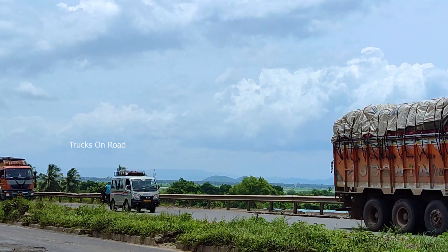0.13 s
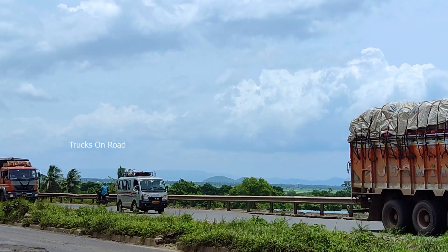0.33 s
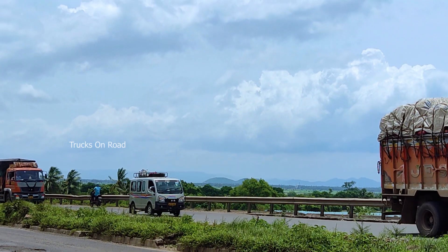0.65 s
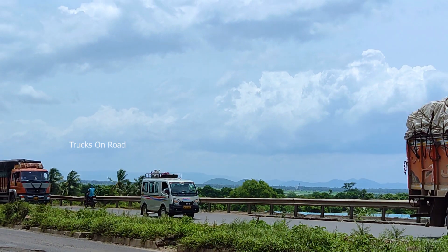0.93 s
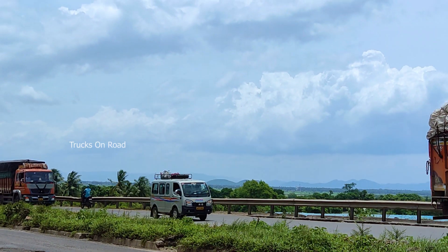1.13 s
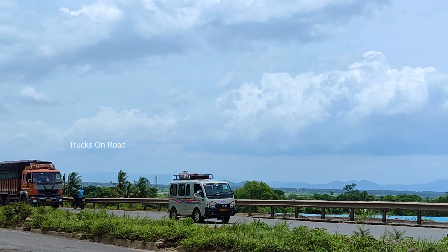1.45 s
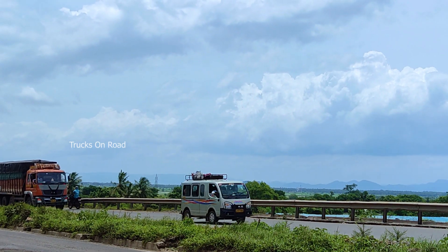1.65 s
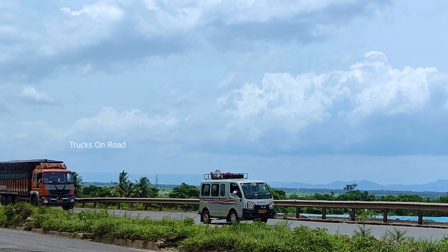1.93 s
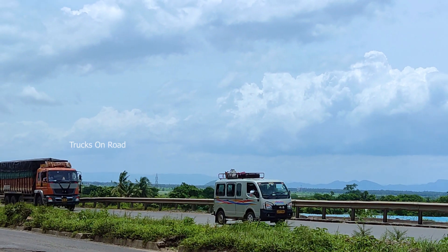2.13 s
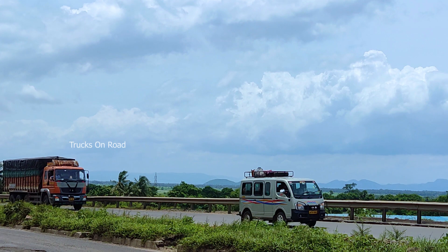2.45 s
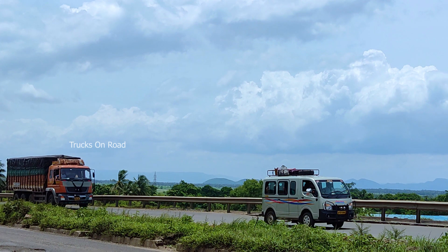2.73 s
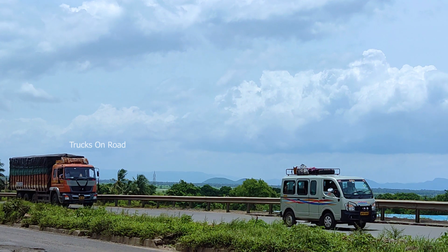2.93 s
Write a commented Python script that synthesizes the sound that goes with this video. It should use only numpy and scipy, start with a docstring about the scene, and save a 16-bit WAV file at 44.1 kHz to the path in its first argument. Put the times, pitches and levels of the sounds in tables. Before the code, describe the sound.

Wind rumbles and puffs independently on left and right microphone ports throughout, while steady, flickering tyre hiss leans left, with a faint singing band and a thin, high turbo whistle slowly climbing; outdoors beside a road.

```python
"""A low wind rumble lies throughout over the hiss of lorries and a van, at a gusty roadside.
Two bare microphone ports hear it: slow random lumps make the rumble, bursts of noise the hollow puffs.
Coloured noise makes the tyre roar, treble hiss and a faint singing band; it comes from the left.
A wavering sine makes a turbocharger whistle that climbs in pitch."""
import sys
import numpy as np
from scipy import signal
from scipy.fft import rfft, irfft, next_fast_len
from scipy.io import wavfile
from scipy.ndimage import uniform_filter1d, map_coordinates

SR = 44100
rng = np.random.default_rng(int(sys.argv[2]) if len(sys.argv) > 2 else 0)


def to_wav(sig):
    """Store sig (one row per channel, or 1-D mono) as 16-bit WAV at the path in sys.argv[1].

    Samples outside -1..1 are clipped; the rate is SR.
    """
    pcm = np.clip(np.atleast_2d(sig), -1, 1) * 32767
    pcm = np.round(pcm).astype(np.int16)
    wavfile.write(sys.argv[1], SR, pcm.T)  # frames by channels


N = 136710  # length in samples

# Steady buffeting of each port by the wind: (t/s, level/dB)
RUMBLE_LEVEL_LEFT = [(0.0, -30.5), (0.07, -39), (0.16, -33.5), (0.34, -37.5), (0.43, -31.5), (0.65, -33.5),
                     (0.91, -37.5), (1.07, -33), (1.22, -27.5), (1.33, -32), (1.42, -27), (1.51, -29),
                     (2.43, -32), (2.51, -34), (2.62, -28), (3.1, -35.5)]
RUMBLE_LEVEL_RIGHT = [(0.0, -38.5), (0.24, -32.5), (0.32, -37.5), (0.53, -33.5), (0.64, -37.5),
                      (1.12, -33.5), (1.33, -35.5), (1.741, -32), (1.82, -33.5), (2.09, -33.5), (2.19, -37),
                      (2.64, -32), (2.71, -41), (2.77, -35.5), (2.96, -32.5), (3.1, -36.5)]
# Colour of the wind rumble: (f/Hz, gain/dB)
RUMBLE_COLOUR = [(20, -3), (40, 1), (120, -1), (250, -4.5), (500, -15.5), (900, -25), (1500, -61),
                 (2500, -120)]
LUMP_DB, LUMP_RATE = 2.5, 40  # depth of the lumps in dB, random points a second

# Traffic at each port: (t/s, tyre roar level/dB, treble hiss level/dB before it flickers)
TRAFFIC_LEVELS_LEFT = [(0.0, -44.5, -47), (0.17, -45.5, -41.5), (0.29, -44.5, -48), (0.53, -43.5, -45),
                       (1.21, -47, -44.5), (1.29, -49.5, -48), (1.39, -42, -44.5), (1.47, -50.5, -52.5),
                       (1.66, -47, -49), (1.85, -47, -51), (1.961, -45.5, -42.5), (2.05, -44, -42.5),
                       (2.17, -51, -50.5), (2.36, -42, -43), (2.41, -48.5, -43.5), (2.51, -52, -51.5),
                       (2.61, -43.5, -43), (2.7, -52, -49), (2.842, -45.5, -44.5), (2.93, -50.5, -45),
                       (3.0, -47, -41), (3.1, -47, -44)]
TRAFFIC_LEVELS_RIGHT = [(0.0, -47, -51), (0.15, -48, -46), (0.29, -47, -51), (0.52, -46.5, -49),
                        (1.03, -46.5, -51.5), (1.26, -47.5, -53), (1.34, -53, -56), (1.4, -44.5, -53),
                        (1.48, -49, -59.5), (1.68, -48, -51), (1.76, -46, -53), (1.818, -60, -65),
                        (1.881, -49, -53.5), (2.032, -42.5, -44), (2.18, -50.5, -55), (2.36, -43, -46),
                        (2.51, -47, -47.5), (2.6, -44, -51), (2.711, -55.5, -59), (2.78, -44.5, -52),
                        (2.94, -50.5, -49), (3.1, -47, -48)]
# Colour of the traffic noise at each port, # stepped near 2.4, 3.85 and 9.65 kHz: (f/Hz, gain/dB)
TRAFFIC_COLOUR_LEFT = [(1000, -7), (2350, -8), (2420, 1), (3000, 0), (3780, -4), (3900, -11.5),
                       (4650, -10.5), (5100, -8), (5800, -12), (7900, -3.5), (9300, -12.5), (9600, -12.5),
                       (9700, -6.5), (10400, -8.5), (11100, -14), (12050, -13), (12200, -16.5),
                       (14100, -19)]
TRAFFIC_COLOUR_RIGHT = [(1000, -8), (2350, -8), (2420, 0), (3000, -1.5), (3780, -9), (3900, -17),
                        (4650, -18), (5170, -12), (5600, -15), (7000, -14), (8800, -10), (9600, -11),
                        (9700, -7), (11000, -19), (12050, -19), (12200, -24), (14100, -33)]
# Traffic noise that both ports share: (f/Hz, share of the power from 0 to 1)
SHARED_POWER = [(1500, 0.81), (3000, 0.44), (5000, 0.34), (8000, 0.25), (12000, .05)]
# How much earlier the left port hears the shared noise: (t/s, lead/s)
LEFT_LEAD = [(0, 0.0002), (3.1, 0.000497)]
TRAFFIC_PATCH_DB = 1.2  # depth of the random patches in the traffic noise
SPLIT_HZ = 3850  # tyre roar below, hiss above
LOW_HZ = 523  # the roar thins out around and below this
# Upper part of the roar, against the rest of it: (t/s, gain/dB)
ROAR_EDGE_GAIN = [(1.3, 0.5), (1.8, -3), (3.1, -0.5)]
ROAR_EDGE_HZ = 3010  # the upper part starts here
# random flicker of hiss, singing and whistle, shared by both ports: depth in dB, random points a second
FLICKER_DB, FLICKER_RATE = 1.2, 22

# Middle of the band of singing noise: (t/s, centre f/Hz)
SING_PITCH = [(0, 5260), (1.2, 5245), (2, 4874), (3.1, 4960)]
SING_DB, SING_LEFT_DB = -17.5, 7.5  # against the hiss; added on the left, taken off on the right
SING_RATE = 380  # random points a second; more of them make a wider band

# Turbocharger pitch, before it wavers: (t/s, f/Hz)
TURBO_PITCH = [(0, 9620), (.5, 9860), (.9, 10020), (1.3, 10240), (1.7, 10340), (2.1, 10400), (2.5, 10450),
               (3.1, 10440)]
# Turbocharger gain against the hiss, before fading and left-right balance: (t/s, gain/dB)
TURBO_GAIN = [(0, -16), (1.5, -15), (1.7, -10), (3.1, -14.5)]
TURBO_WAVER_HZ, TURBO_FADE_DB = 14, 3.5  # depth of the random waver and of the random fading
TURBO_LEFT_DB = 1.5  # added on the left, taken off on the right

FAR_DB, FAR_TOP_HZ = -64.5, 6400  # steady bed of low treble from farther traffic: level, upper limit

# Puffs of wind on each port: (t/s, length/s, level/dB, centre f/Hz, treble fall/(dB/octave))
WIND_PUFFS_LEFT = [(0.15, 0.012, -24, 348, 33), (0.227, 0.017, -31, 315, 14),
                   (0.299, 0.014, -30, 228, 13.5), (0.41, 0.061, -32, 205, 16),
                   (0.422, 0.013, -22.5, 165, 14.5), (0.494, 0.0035, -33.5, 420, 7),
                   (0.572, 0.0082, -26, 111, 11), (0.711, 0.032, -30, 261, 21),
                   (0.819, 0.026, -29, 156, 30), (0.82, 0.0098, -26, 583, 50),
                   (0.89, 0.034, -28.5, 317, 19), (0.985, 0.039, -33, 394, 12),
                   (1.148, 0.074, -37, 910, -4), (1.172, 0.051, -21.5, 420, 15),
                   (1.237, 0.019, -17, 484, 15), (1.272, 0.039, -19, 397, 10.5),
                   (1.324, 0.036, -26, 417, 16), (1.382, 0.0097, -19, 423, 21),
                   (1.402, 0.12, -28.5, 362, 11.5), (1.524, 0.043, -31, 310, 7.5),
                   (1.564, 0.056, -30.5, 260, 9), (1.646, 0.021, -26.5, 264, 20),
                   (1.695, 0.007, -20, 364, 15), (1.878, 0.084, -33, 383, 15),
                   (2.033, 0.08, -30.5, 383, 6.5), (2.185, 0.023, -27.5, 277, 13),
                   (2.225, 0.015, -33, 216, 9), (2.347, 0.09, -29.5, 290, 9), (2.454, 0.049, -38, 303, 11),
                   (2.542, 0.1, -34.5, 280, 8), (2.619, 0.097, -25, 377, 14), (2.789, 0.021, -22, 510, 24),
                   (2.859, 0.082, -29, 263, 9), (2.943, 0.045, -29, 230, 36),
                   (3.041, 0.043, -33, 250, 14.5)]
WIND_PUFFS_RIGHT = [(0.107, 0.0099, -22.5, 323, 26), (0.132, 0.013, -23.5, 414, 40),
                    (0.234, 0.033, -19, 486, 36), (0.768, 0.015, -35, 336, 18),
                    (0.819, 0.006, -24, 545, 54), (0.9, 0.12, -30, 400, 37), (0.955, 0.048, -27.5, 466, 28),
                    (1.005, 0.019, -21.5, 500, 73), (1.073, 0.018, -67, 384, 5),
                    (1.108, 0.041, -20.5, 360, 16), (1.142, 0.038, -17, 553, 14),
                    (1.19, 0.023, -17, 576, 19), (1.218, 0.022, -13, 505, 16),
                    (1.248, 0.026, -12.5, 450, 10.5), (1.272, 0.03, -12, 358, 12.7),
                    (1.304, 0.041, -21.5, 425, 12.6), (1.362, 0.041, -27, 503, 13),
                    (1.407, 0.067, -22, 454, 17), (1.525, 0.014, -21, 500, 11),
                    (1.539, 0.027, -22.5, 540, 12.5), (1.591, 0.013, -24.5, 520, 13),
                    (1.672, 0.0064, -29, 480, 17), (1.706, 0.0051, -21.5, 450, 21),
                    (1.746, 0.0064, -23, 408, 21), (1.775, 0.006, -20, 420, 16),
                    (1.873, 0.051, -24.5, 486, 17), (2.015, 0.017, -20, 645, 23),
                    (2.038, 0.063, -23, 785, 13), (2.058, 0.04, -21, 790, 41), (2.11, 0.042, -26, 620, 11),
                    (2.22, 0.022, -32, 315, 7.8), (2.375, 0.012, -25, 595, 11),
                    (2.522, 0.043, -29, 550, 15), (2.585, 0.018, -25, 930, 34),
                    (2.605, 0.041, -16, 500, 11.5), (2.643, 0.033, -18, 590, 16.6),
                    (2.676, 0.02, -22.5, 430, 30), (2.714, 0.024, -36, 435, 30),
                    (2.768, 0.028, -18, 592, 34), (2.831, 0.094, -27.5, 467, 11),
                    (2.913, 0.073, -32.5, 390, 14.5), (2.963, 0.061, -29, 405, 13.3)]
PUFF_RISE_DB, PUFF_KNEE = 4, 1.232  # rise in dB an octave below the knee; knee over centre
CORE_DB, CORE_WIDTH = 6, 0.19  # hollow core at the centre; width in octaves, also of the overtone
OVERTONE_DB = 1.5  # weaker overtone an octave above the centre
BASS_HZ, BASS_FREE_DB = 271, -29.5  # below this pitch, puffs above this level lose bass
BASS_LOSS = 1  # dB lost for each dB above that level
PUFF_TOP_HZ = 1940  # puffs weaken above
FLUTTER_DB, FLUTTER_RATE = 3, 76.8  # depth in dB, random points a second
PUFF_STEADY = 0.69  # how far chance swells of the puff noise are evened out, 0-1
PUFF_ATTACK_S, PUFF_RELEASE_S = 0.00058, 0.0015  # softness of the edges, before the share below
PUFF_SOFTEN = 0.15  # share of the length added to the release; half as much to the attack
PUFF_LEAD_IN_S = 0.03  # room for the soft attack

TOP_HZ = 14200  # the recorder's band limit


def amp(db):
    """Turn decibels into a plain multiplier."""
    return 10 ** (np.asarray(db) / 20)


def unit(x):
    """Scale a signal to an average (rms) strength of 1."""
    return x / np.sqrt(np.mean(x ** 2) + 1e-20)


def along(points, hz):
    """Read values between (f/Hz, value) points on a log pitch axis."""
    f, v = np.transpose(points)
    return np.interp(np.log(hz + 1), np.log(f + 1), v)


def curves(rows):
    """Draw one value per sample for each column after the time."""
    times, *columns = np.transpose(rows)
    return [np.interp(np.arange(N) / SR, times, column) for column in columns]


def wobble(rate):
    """Make a smooth random curve through this many random points a second."""
    return map_coordinates(rng.standard_normal(4000), [np.arange(N) * rate / SR])


def filtered(x, response):
    """Multiply each frequency of x by the response."""
    m = next_fast_len(N + SR // 2)
    spectrum = rfft(x, m) * response(np.fft.rfftfreq(m, 1 / SR))
    return irfft(spectrum, m)[..., :N]


def patches(shape, bins, frames):
    """Make a random field of rms 1, smooth over some frequency bins and time frames."""
    across_pitch = uniform_filter1d(rng.standard_normal(shape), bins, axis=0)
    return unit(uniform_filter1d(across_pitch, frames, axis=1))


def tone(track, waver_hz):
    """Make a sine that follows a pitch curve and wavers around it."""
    pitch_hz = curves(track)[0] + waver_hz * wobble(99)
    return np.sin(2 * np.pi * np.cumsum(pitch_hz) / SR)


def rumble(levels):
    """Slow eddies press on the port in lumps."""
    noise = filtered(rng.standard_normal(N), lambda hz: amp(along(RUMBLE_COLOUR, hz)))
    lumpy = unit(noise * amp(LUMP_DB * wobble(LUMP_RATE)))
    return amp(curves(levels)[0]) * lumpy


def traffic_noises():
    """Patchy noise, partly shared by the ports; the shared part reaches the left port first."""
    grid = signal.stft(rng.standard_normal((3, N)), nperseg=512)[2]
    patchy = grid * amp(TRAFFIC_PATCH_DB * patches(grid.shape[1:], 5, 6))
    common, *own = signal.istft(patchy, nperseg=512)[1][:, :N]
    late = map_coordinates(common, [np.arange(N) - SR * curves(LEFT_LEAD)[0]], order=5)
    share = lambda hz: np.clip(along(SHARED_POWER, hz), 0, 1)
    return [filtered(shared, lambda hz: np.sqrt(share(hz)))
            + filtered(alone, lambda hz: np.sqrt(1 - share(hz)))
            for shared, alone in zip((common, late), own)]


def tyre_roar(noise, colour):
    """The lower traffic noise, whose upper part changes in strength with time."""
    def response(hz):
        return amp(along(colour, hz)) * (hz < SPLIT_HZ) / (1 + (LOW_HZ / (hz + 1)) ** 4)
    roar = filtered(noise, response)
    edge = filtered(roar, lambda hz: hz > ROAR_EDGE_HZ)
    return unit(roar - edge + amp(curves(ROAR_EDGE_GAIN)[0]) * edge)


def treble_hiss(noise, colour):
    """The traffic noise above the split, in its colour at each port."""
    return unit(filtered(noise, lambda hz: amp(along(colour, hz)) * (hz >= SPLIT_HZ)))


def singing(side):
    """A sine made strong and weak at random spreads into a narrow band of noise."""
    return amp(SING_DB + side * SING_LEFT_DB) * unit(tone(SING_PITCH, 0) * wobble(SING_RATE))


def turbo_whistle():
    """A climbing, wavering sine that comes and goes in strength."""
    gain_db = curves(TURBO_GAIN)[0] + TURBO_FADE_DB * wobble(23)
    return tone(TURBO_PITCH, TURBO_WAVER_HZ) * amp(gain_db)


def far_traffic(colour):
    """A steady bed of noise in the low treble."""
    def response(hz):
        return amp(along(colour, hz)) * (hz >= SPLIT_HZ) * (hz < FAR_TOP_HZ)
    return amp(FAR_DB) * unit(filtered(rng.standard_normal(N), response))


def traffic():
    """Each port adds roar and far traffic to a flickering mix of hiss, singing and whistle."""
    whistle = turbo_whistle()
    flicker_db = FLICKER_DB * wobble(FLICKER_RATE)
    ports = [(TRAFFIC_LEVELS_LEFT, TRAFFIC_COLOUR_LEFT, 1),
             (TRAFFIC_LEVELS_RIGHT, TRAFFIC_COLOUR_RIGHT, -1)]
    out = []
    for noise, (levels, colour, side) in zip(traffic_noises(), ports):
        roar_db, hiss_db = curves(levels)
        roar = amp(roar_db) * tyre_roar(noise, colour)
        treble = treble_hiss(noise, colour) + singing(side) + amp(side * TURBO_LEFT_DB) * whistle
        out.append(far_traffic(colour) + roar + amp(hiss_db + flicker_db) * treble)
    return np.array(out)


def puff_colour(hz, db, centre_hz, fall_db):
    """Each puff is strongest around a centre pitch, with a weaker overtone an octave up."""
    x = hz / (centre_hz * PUFF_KNEE)
    broad = 1 / np.sqrt(x ** (-PUFF_RISE_DB / 3) + x ** (fall_db / 3))
    peak = lambda at: np.exp(-(np.log2(hz / at) / CORE_WIDTH) ** 2 / 2)
    core_db = CORE_DB * peak(centre_hz) + OVERTONE_DB * peak(2 * centre_hz)
    # stronger puffs lose more bass
    bass_db = -BASS_LOSS * max(db - BASS_FREE_DB, 0) / (1 + (hz / BASS_HZ) ** 16)
    return broad * amp(core_db + bass_db) / (1 + (hz / PUFF_TOP_HZ) ** 4)


def puffs(rows):
    """Each puff of coloured noise rises, holds and dies while it flutters."""
    size = 8192  # samples for one puff
    out = np.zeros(N + size)
    t, hz = np.arange(size) / SR, np.fft.rfftfreq(size, 1 / SR) + 1
    noises = rng.standard_normal((len(rows), size))
    for (start, length, db, centre_hz, fall_db), noise in zip(rows, noises):
        coloured = unit(irfft(rfft(noise) * puff_colour(hz, db, centre_hz, fall_db)))
        swell = np.abs(uniform_filter1d(coloured ** 2, 400) + .05)
        steadier = coloured / swell ** (PUFF_STEADY / 2)
        attack = PUFF_ATTACK_S + PUFF_SOFTEN * length / 2
        release = PUFF_RELEASE_S + PUFF_SOFTEN * length
        rising = 1 / (1 + np.exp((PUFF_LEAD_IN_S - t) / attack))
        dying = 1 / (1 + np.exp((t - PUFF_LEAD_IN_S - length) / release))
        shape = rising * dying
        # the first noise values also serve as the random points of the flutter
        flutter = amp(FLUTTER_DB * map_coordinates(noise, [t * FLUTTER_RATE]))
        puff = shape * steadier * flutter
        # give the puff the same energy as its smooth shape, then its level
        puff *= amp(db) * np.linalg.norm(shape) / np.linalg.norm(puff)
        out[round((start - PUFF_LEAD_IN_S) * SR):][:size] += puff
    return out[:N]


def wind():
    """The two ports are buffeted independently."""
    left = puffs(WIND_PUFFS_LEFT) + rumble(RUMBLE_LEVEL_LEFT)
    right = puffs(WIND_PUFFS_RIGHT) + rumble(RUMBLE_LEVEL_RIGHT)
    return np.array([left, right])


def scene():
    """Wind on the ports over the traffic."""
    return wind() + traffic()


def record(dry):
    """The recorder keeps nothing above its band limit."""
    return filtered(dry, lambda hz: hz < TOP_HZ)


dry = scene()
out = record(dry)
to_wav(out)
```